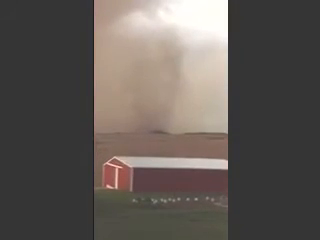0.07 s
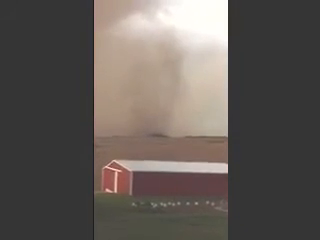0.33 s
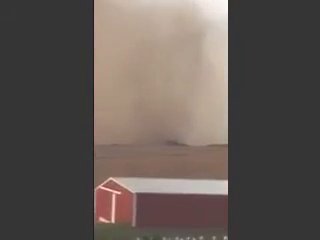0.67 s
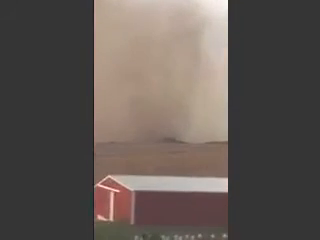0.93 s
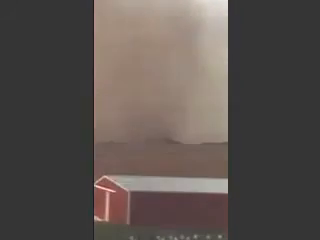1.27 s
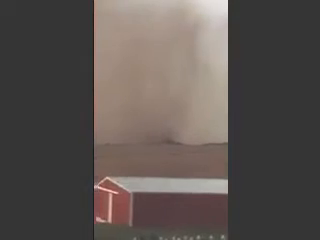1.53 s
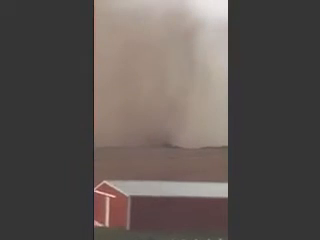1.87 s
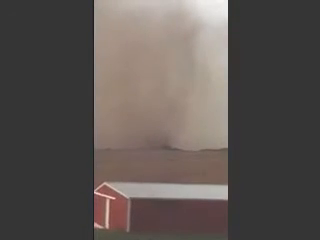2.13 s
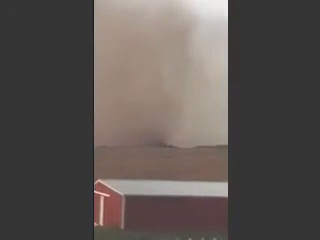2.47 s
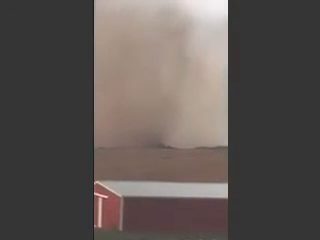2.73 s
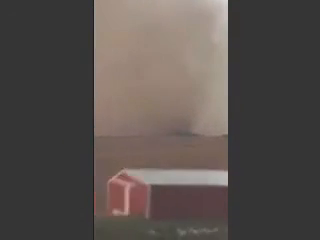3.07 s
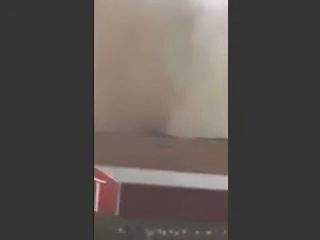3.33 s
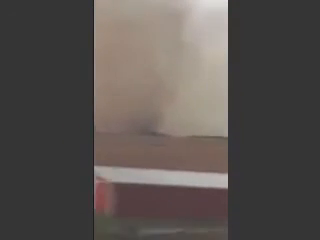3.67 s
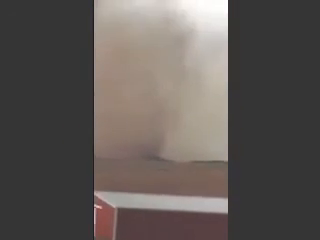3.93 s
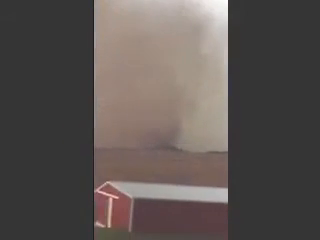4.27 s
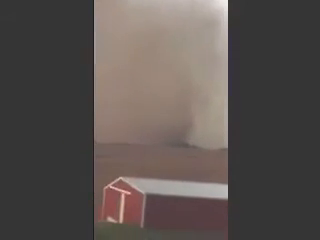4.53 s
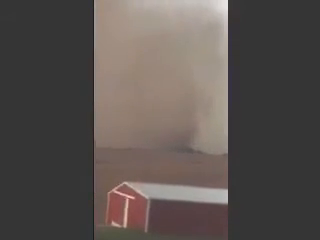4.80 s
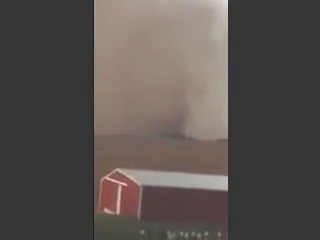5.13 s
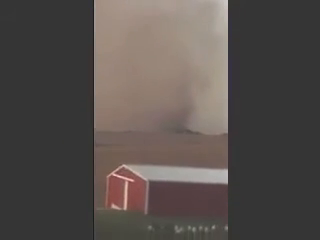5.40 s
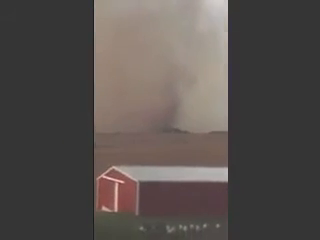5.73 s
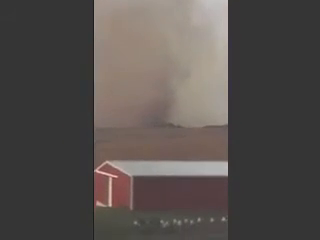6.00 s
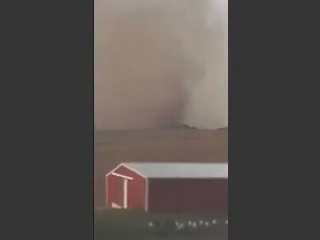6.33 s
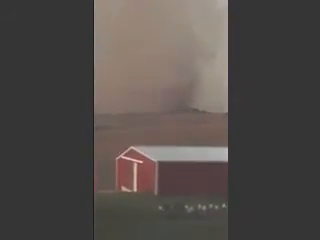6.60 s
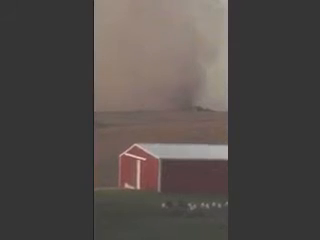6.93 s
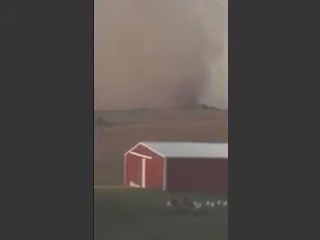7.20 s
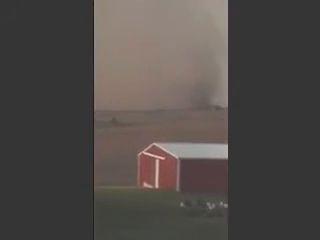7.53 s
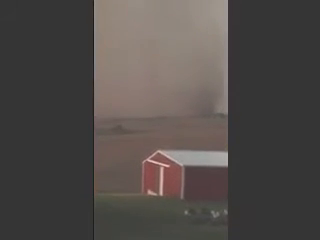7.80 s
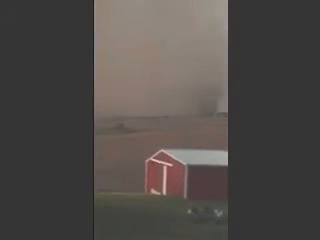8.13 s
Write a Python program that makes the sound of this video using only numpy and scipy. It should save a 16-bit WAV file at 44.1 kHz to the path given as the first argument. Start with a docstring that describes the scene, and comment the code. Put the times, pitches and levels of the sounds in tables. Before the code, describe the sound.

Strong gusting wind rumbles and buffets the microphone on open farmland, with a few handling knocks and faint chirps.

```python
"""Storm wind buffets a hand-held microphone on open farmland, in gusts riding on a slow swell.
Large eddies rumble and thud on the microphone port; small ones tear past with a rough flutter and rasp.
Close up, the hand knocks, clicks and rubs on the case. Faint chirps and the storm farther out
over the fields come through the lulls.
The recorder's low sample rate dulls it all and mirrors it faintly into the treble."""
import sys
import numpy as np
from scipy import signal
from scipy.fft import rfft, irfft, next_fast_len
from scipy.io import wavfile
from scipy.ndimage import uniform_filter1d

SR = 44100
rng = np.random.default_rng(int(sys.argv[2]) if len(sys.argv) > 2 else 0)


def store_wav(level_fs):
    """Save 16-bit WAV to argv[1]."""
    pcm = np.round(np.clip(np.atleast_2d(level_fs), -1, 1) * 32767)
    wavfile.write(sys.argv[1], SR, pcm.T.astype(np.int16))


N = 360297
TIME = np.arange(N) / SR


def wind(moderate_flow_db=-28.5, rumble_follows=0.32, rasp_db=-7.5, rasp_growth=0.78):
    """Wind right on the microphone: four sizes of eddy rumble, roar, flutter and rasp at the port."""
    # slow swell of the large eddies pressing on the port: (time [s], level [dB])
    pressure = [(0.0, -20.5), (0.56, -20.5), (0.75, -26.0), (0.87, -19.5), (1.31, -22.5), (1.56, -21.5),
                (1.74, -19.5), (2.77, -29.5), (2.97, -21.5), (3.62, -24.5), (3.84, -21.5), (4.3, -24.5),
                (4.61, -16.5), (4.93, -19), (4.99, -24), (5.36, -20), (5.84, -23.5), (6.16, -22.5),
                (6.55, -25), (7.28, -31), (8.17, -27.5)]
    # steady flow across the port between gusts: (time [s], level [dB])
    steady_flow = [(0.0, -35.5), (0.47, -41.5), (0.89, -34.5), (1.29, -36.5), (2.05, -35.0), (2.09, -38.5),
                   (2.5, -43.5), (2.79, -50), (2.87, -35), (3.45, -31), (3.54, -48.5), (3.91, -29),
                   (4.31, -33), (4.53, -24.0), (5.05, -28.5), (5.5, -27), (5.84, -42), (6.31, -38.5),
                   (7.26, -47.5), (7.59, -40.5), (8.17, -46)]
    # eddy spectra, largest eddies first: (frequency [Hz], relative density [dB])
    rumble_spectrum = [(25, -34.5), (36, -24), (48, -19.5), (64, -1), (95, 0.5), (160, -0.3), (210, -1.5),
                       (310, -1.5), (380, -7), (520, -16.5), (900, -63)]
    roar_spectrum = [(150, -38.5), (280, 4), (400, 0.5), (520, 0.5), (700, -1.5), (900, -14), (1500, -61),
                     (2500, -63)]
    flutter_spectrum = [(350, -31), (600, -8), (800, 1), (1020, 4.5), (1250, -3.5), (1550, -13.5),
                        (2000, -17.5), (2900, -41), (3900, -42)]
    rasp_spectrum = [(900, -19.5), (1220, 0), (1450, -3), (2000, -13.5), (2900, -24), (3900, -31)]

    # gusts add to the steady flow and lift the rumble with them
    steady_db = in_time(steady_flow)
    gust_power, rasp_weighted_power = gusts()
    power = from_db(steady_db) ** 2 + gust_power
    flow_db = 10 * np.log10(power)
    rumble_db = in_time(pressure) + rumble_follows * (flow_db - steady_db)
    roar_db = rumble_db + 0.36 * (flow_db - rumble_db)   # middle sizes follow pressure and flow
    slap = buffets()
    # weak flow breaks away from the port in fits; a full gust is more even
    fitful = np.clip(1 - 0.025 * (flow_db - moderate_flow_db), 0.4, 1.1)
    bursts = fitful * (2.55 * drift(20) + 2.88 * drift(380))

    def eddies(spectrum, level_db, burstiness, slap_db):
        """One size of eddy: the lumpy running flow, with the buffets on top."""
        lumps_db = burstiness * (0.86 * bursts + 1.92 * drift(39))   # partly shared, partly its own
        running = evened(noise(spectrum) * from_db(lumps_db), span_s=0.079)
        slapping = slap * evened(noise(spectrum), span_s=0.018)
        return from_db(level_db) * running + from_db(slap_db) * slapping

    flutter = eddies(flutter_spectrum, flow_db + 0.32, burstiness=1.22, slap_db=0.7)
    rasp = eddies(rasp_spectrum, flow_db - 0.3, burstiness=0.64, slap_db=-5.6)
    rumble = eddies(rumble_spectrum, rumble_db - 0.4, burstiness=0.6, slap_db=0.7)
    roar = eddies(roar_spectrum, roar_db - 2.0, burstiness=0.62, slap_db=-1)
    # faster flow moves its power from the flutter into the rasp
    speed_db = 10 * np.log10(power + 0.27 * slap ** 2)   # buffets quicken the flow too
    gust_rasp_db = rasp_weighted_power / power
    rasp_ratio = from_db(rasp_db + rasp_growth * (speed_db - moderate_flow_db) + gust_rasp_db)
    return rumble + roar + (flutter + rasp_ratio * rasp) / np.hypot(1, rasp_ratio)


def gusts(attack_s=0.012, release_s=0.012):
    """Gusts rise quickly, hold and fall away: their power, and the same weighted by their extra rasp."""
    # gusts reaching the microphone: (arrival [s], hold [s], level [dB], extra rasp [dB])
    arrivals = [(0.114, 0.24, -36, 6), (0.539, 0.08, -30, -3), (0.694, 0.034, -34.5, -12),
                (0.961, 0.14, -33.5, 5), (1.129, 0.13, -27.5, 1.5), (1.353, 0.067, -30.5, 9.5),
                (1.805, 0.079, -27.5, -4), (2.243, 0.038, -27, -16), (2.359, 0.099, -34.5, -4),
                (2.546, 0.082, -33, -3), (2.74, 0.0027, -40.5, -1), (2.847, 0.048, -27.5, -9),
                (3.012, 0.067, -25, 4.5), (3.23, 0.13, -28.5, 2.5), (3.586, 0.12, -35.5, 6),
                (3.947, 0.098, -28, 0.5), (4.094, 0.19, -28.0, -4), (4.367, 0.077, -27, 4),
                (4.464, 0.11, -19, 1), (4.699, 0.065, -24, 1), (4.808, 0.082, -21.0, -0.5),
                (4.945, 0.02, -24, -12), (5.105, 0.074, -21.5, -6), (5.203, 0.035, -26, 4),
                (5.307, 0.16, -22, 1.5), (5.509, 0.017, -30.5, 24), (5.666, 0.13, -33, 1.5),
                (5.909, 0.046, -32.5, 0.5), (6.03, 0.044, -29, 0), (6.111, 0.082, -29.5, -2),
                (6.269, 0.069, -29, -4), (6.367, 0.076, -32.5, 4), (6.617, 0.028, -35, -2),
                (6.735, 0.065, -28.5, -5), (6.86, 0.054, -30.5, -14), (6.98, 0.023, -40, -0.5),
                (7.127, 0.046, -29, -2.5), (7.342, 0.014, -34, 4), (7.71, 0.083, -35, -14),
                (7.87, 0.079, -33, -15), (7.962, 0.12, -33, -4), (8.096, 0.017, -31, -4)]
    power, rasp_weighted_power = np.zeros(N), np.zeros(N)
    for s, hold_s, level_db, rasp_db in arrivals:
        near = slice(max(int((s - attack_s) * SR), 0), int((s + hold_s + 10 * release_s) * SR))
        age = TIME[near] - s
        rise = np.clip(1 + age / attack_s, 0, 1)
        fall = np.exp(-np.maximum(age - hold_s, 0) / release_s)
        gust = (from_db(level_db) * rise * fall) ** 2
        power[near] += gust
        rasp_weighted_power[near] += rasp_db * gust
    return power, rasp_weighted_power


def buffets(rise_s=0.004, decay_s=0.0099):
    """Strength of single slaps of air on the port: each swells within milliseconds and dies away."""
    # slaps of air: (time [s], peak [dB])
    slaps = [(.119, -24.5), (.776, -25.5), (.823, -20), (0.959, -19), (1.222, -16.5), (1.251, -16),
             (2.362, -22), (2.497, -27.5), (2.783, -30), (2.844, -18), (2.856, -17.5), (3.157, -20.5),
             (4.014, -21), (4.128, -23), (4.158, -23.5), (4.345, -25), (5.037, -18), (5.284, -20.5),
             (5.594, -23), (6.043, -24), (6.297, -23), (6.743, -24), (6.877, -20.5), (7.194, -23),
             (7.494, -27), (7.591, -18.5), (7.619, -27.5)]
    out = np.zeros(N)
    for s, peak_db in slaps:
        near = slice(int((s - rise_s) * SR), int((s + 10 * decay_s) * SR))
        age = TIME[near] - s
        rise = np.clip(1 + age / rise_s, 0, 1)
        out[near] += from_db(peak_db) * rise * np.exp(-(age / decay_s) ** 2)
    return out


def thuds(half_length_s=0.022, waver=0.25):
    """Single large eddies thud on the port, each a short, round swell of a few uneven cycles."""
    # large eddies: (time [s], peak [dB], pitch [Hz])
    large_eddies = [(.555, -14.5, 310), (.979, -19, 125), (1.261, -10.5, 290), (1.925, -14.5, 120),
                    (2.476, -20, 210), (3.319, -14, 145), (4.49, -14, 190), (4.61, -14, 94.8),
                    (5.96, -20, 159.7), (5.38, -10.5, 180), (6.03, -19, 85), (6.159, -12.5, 95.3),
                    (6.432, -11.5, 290), (6.648, -17, 270), (7.008, -21, 105), (7.153, -20.5, 240),
                    (7.907, -17.5, 240), (7.969, -17.5, 100)]
    out = np.zeros(N)
    unsteady = np.exp(waver * drift(90))
    for s, peak_db, hz in large_eddies:
        near = np.abs(TIME - s) < 10 * half_length_s
        swell = np.exp(-((TIME[near] - s) / half_length_s) ** 2)
        phase = 2 * np.pi * np.cumsum(hz * unsteady[near]) / SR
        out[near] += from_db(peak_db) * swell * np.sin(phase)
    return out


def pops(half_length_s=0.0025):
    """An eddy breaks over the port with a hollow pop that swells and dies within a few cycles."""
    # breaking eddies: (time [s], pitch [Hz], peak [dB])
    breaks = [(0.824, 830, -8.5), (1.391, 1600, -17), (2.783, 700, -19), (2.845, 960, -17),
              (3.066, 1270, -5.5), (3.159, 960, -10.5), (4.129, 1090, -17), (6.048, 985, -15),
              (7.595, 1300, -19.5)]
    out = np.zeros(N)
    for s, hz, peak_db in breaks:
        near = np.abs(TIME - s) < half_length_s
        age = TIME[near] - s
        swell = np.cos(np.pi / 2 * age / half_length_s) ** 2
        out[near] += from_db(peak_db) * swell * np.sin(2 * np.pi * (hz * age + rng.random()))
    return out


def handling():
    """Handling noise at the microphone: the hand sets the case, grip and body ringing."""
    # knocks on the case, clicks of the grip, soft bumps on the body: (time [s], strength [dB])
    knocks = [(3.3772, -14), (3.379, 0), (3.4265, -16)]
    clicks = [(2.9812, -19), (2.9862, -18), (2.9874, -2.5), (2.996, -20), (3.158, -15), (4.379, -18),
              (4.416, -9.5)]
    bumps = [(1.2595, -15), (2.9895, -20), (6.0245, -6.5)]
    # modes that each of them rings: (frequency [Hz], gain [dB], time to fall 60 dB [s])
    case_modes = [(532, 2.5, 0.035), (590, -20.5, 0.33), (940, -29, .012), (1600, -18, 0.02),
                  (2600, -42, 0.0059)]
    grip_modes = [(770, 1, 0.0077), (1550, -12.5, 0.006), (2590, -10.5, 0.0086), (2930, -27, 0.016)]
    body_modes = [(50, -7, 0.091), (170, 4, 0.029)]
    grip_hits = list(clicks) + rubbing()
    return struck(knocks, case_modes) + struck(grip_hits, grip_modes) + struck(bumps, body_modes)


def rubbing(slips_per_s=900, spread_db=4.5):
    """Skin sticks and slips on the case: swells of tiny uneven hits, as (time [s], strength [dB])."""
    # finger rubs: (middle [s], half length [s], strength [dB])
    rubs = [(1.944, 0.062, -45), (3.42, 0.056, -33), (3.668, 0.033, -43), (4.4, 0.044, -24)]
    slips = []
    for s, half_length_s, level_db in rubs:
        count = int(2 * half_length_s * slips_per_s)
        place = rng.uniform(-1, 1, count)
        slip_db = level_db - 12 * place ** 2 + spread_db * rng.standard_normal(count)
        slips += zip(s + half_length_s * place, slip_db)
    return slips


def chirps(arch=0.043, waver=0.035, rough_db=4.5):
    """Faint chirps behind the wind: short hoarse notes that arch in pitch."""
    # notes: (middle [s], half length [s], pitch [Hz], level [dB])
    notes = [(.41, 0.026, 3210, -57), (0.442, .025, 1950, -46), (.785, .03, 3150, -58),
             (1.296, 0.042, 3070, -52), (1.652, .04, 3270, -56), (1.941, .025, 3250, -50),
             (1.975, .025, 1920, -39), (2.176, 0.029, 1920, -39.5), (2.468, 0.032, 1920, -48),
             (2.669, 0.025, 1880, -40.5), (7.08, 0.02, 3140, -58)]
    out = np.zeros(N)
    unsteady = waver * drift(400)
    for s, half_length_s, hz, level_db in notes:
        near = np.abs(TIME - s) < half_length_s
        place = (TIME[near] - s) / half_length_s
        pitch_hz = hz * (1 - arch * place ** 2 + unsteady[near])
        phase = 2 * np.pi * np.cumsum(pitch_hz) / SR
        out[near] += from_db(level_db) * np.cos(np.pi / 2 * place) ** 2 * np.sin(phase)
    return out * from_db(rough_db * drift(300))


def far_storm(level_db=-43.5):
    """The storm farther out over the fields: a steady bed of noise."""
    # distant wind: (frequency [Hz], relative density [dB])
    spectrum = [(60, -6.5), (300, 3), (1000, -19.5), (2000, -23), (3000, -31.5), (3900, -30.5)]
    return from_db(level_db) * noise(spectrum)


def from_db(db):
    """Decibels to gain."""
    return 10 ** (np.asarray(db) / 20)


def rms_one(x):
    """Scale to unit power."""
    return x / np.sqrt(np.mean(x ** 2) + 1e-20)


def in_time(curve):
    """A curve of (time [s], level [dB]) at every sample."""
    s, level_db = np.transpose(curve)
    return np.interp(TIME, s, level_db)


def drift(rate_hz):
    """Smooth random wander of unit power, mostly slower than `rate_hz`."""
    hz = np.arange(N // 2 + 1) * SR / N
    return rms_one(irfft(rfft(rng.standard_normal(N)) / (1 + (hz / rate_hz) ** 2), N))


def noise(spectrum):
    """Noise of unit power with the given spectrum."""
    size = next_fast_len(N, real=True)
    hz, level_db = np.transpose(spectrum)
    bin_hz = np.maximum(np.arange(size // 2 + 1) * SR / size, 1)
    gain = from_db(np.interp(np.log(bin_hz), np.log(hz), level_db, left=-120, right=-120))
    return rms_one(irfft(rfft(rng.standard_normal(size)) * gain, size)[:N])


def evened(x, span_s):
    """Hold the slow level at 1 and keep the quick lumps."""
    size = max(int(span_s * SR), 2)
    slow_power = uniform_filter1d(uniform_filter1d(x ** 2, size), size)
    return x / np.sqrt(np.abs(slow_power) + 1e-12)


def struck(hits, modes):
    """Every hit sets all modes ringing as dying sines."""
    impulses, out = np.full(N, 1e-18), np.zeros(N)
    for s, level_db in hits:
        impulses[round(s * SR)] += from_db(level_db)
    for hz, gain_db, t60 in modes:
        decay, angle = from_db(-60 / (t60 * SR)), 2 * np.pi * hz / SR   # per sample
        ring = signal.lfilter([0, np.sin(angle)], [1, -2 * decay * np.cos(angle), decay ** 2], impulses)
        out += from_db(gain_db) * ring
    return out


def scene():
    """Wind and hand right at the microphone, the chirps and the storm beyond; mono."""
    return (wind() + thuds() + pops() + handling() + chirps() + far_storm())[None]


def record(dry, low_cut_hz=42, voice_band_hz=3700, recorder_hz=8000, treble_stop_hz=16400):
    """A narrow-band hand-held recorder: it cuts bass and treble, clips overloads and samples slowly."""
    low_cut = signal.sosfilt(signal.butter(4, low_cut_hz, "high", fs=SR, output="sos"), dry[0])
    voice_band = signal.sosfilt(signal.butter(5, voice_band_hz, fs=SR, output="sos"), low_cut)
    ticks = np.arange(0, N / SR, 1 / recorder_hz)
    samples = np.clip(np.interp(ticks, TIME, voice_band), -1, 1)
    # straight lines between the samples mirror the wind into the treble as a thin, gritty hiss
    played = np.interp(TIME, ticks, samples)
    return signal.sosfilt(signal.cheby2(16, 70, treble_stop_hz, fs=SR, output="sos"), played)[None]


dry = scene()
out = record(dry)
store_wav(out)
```